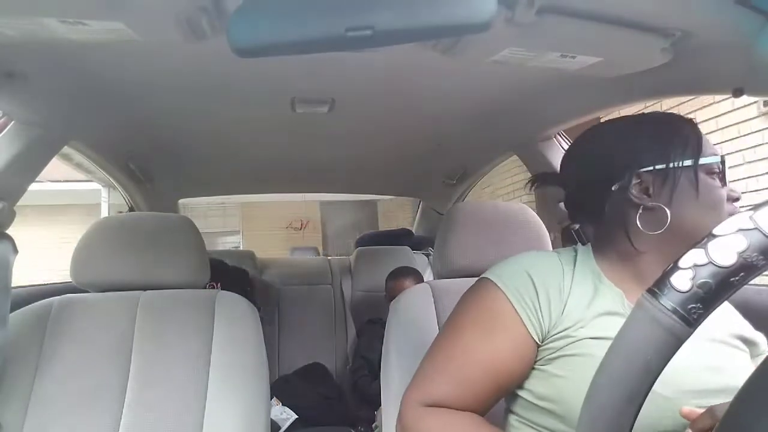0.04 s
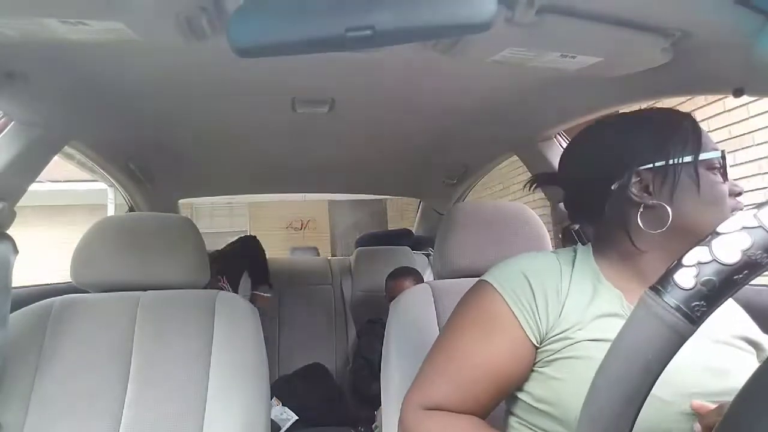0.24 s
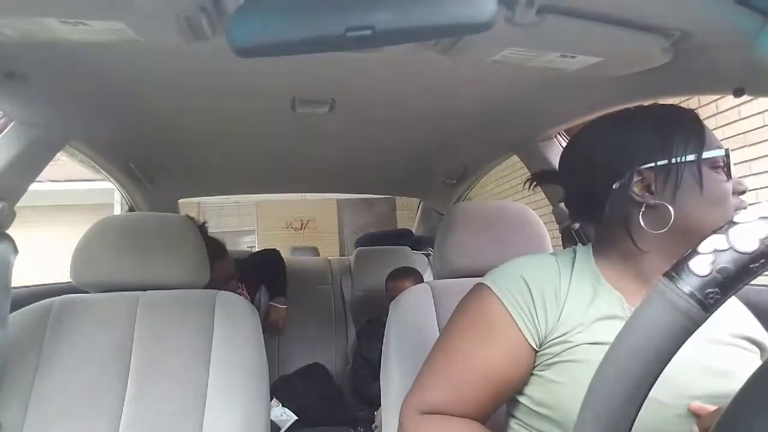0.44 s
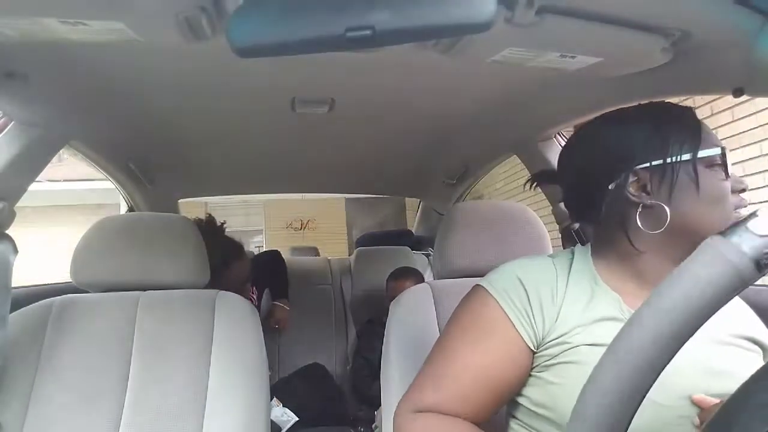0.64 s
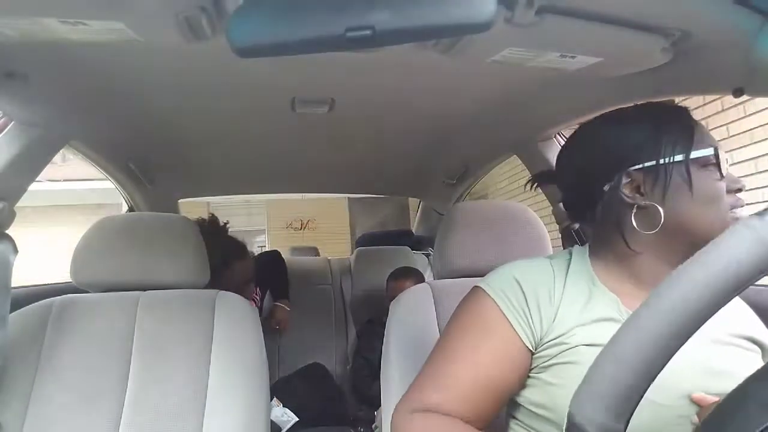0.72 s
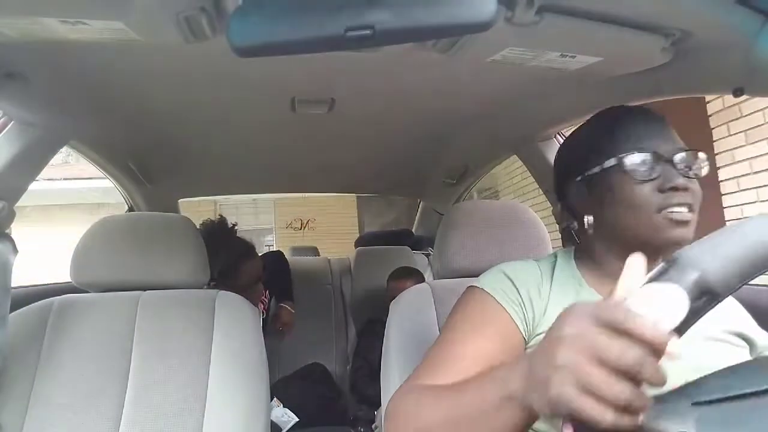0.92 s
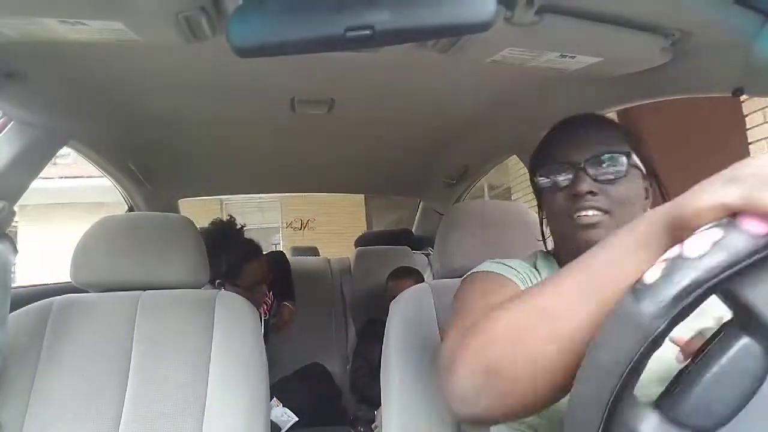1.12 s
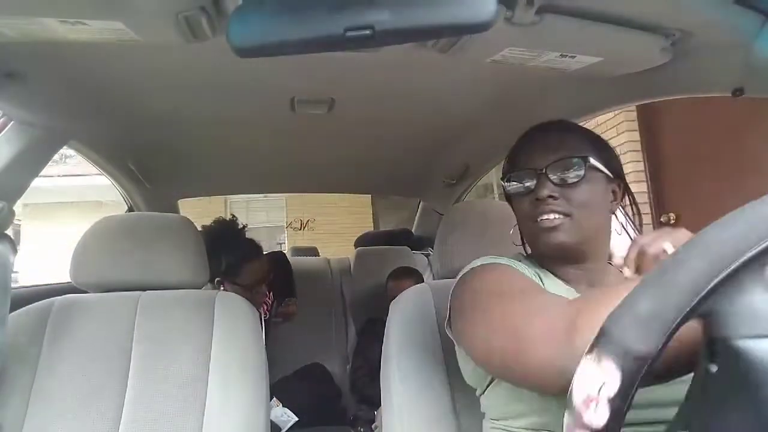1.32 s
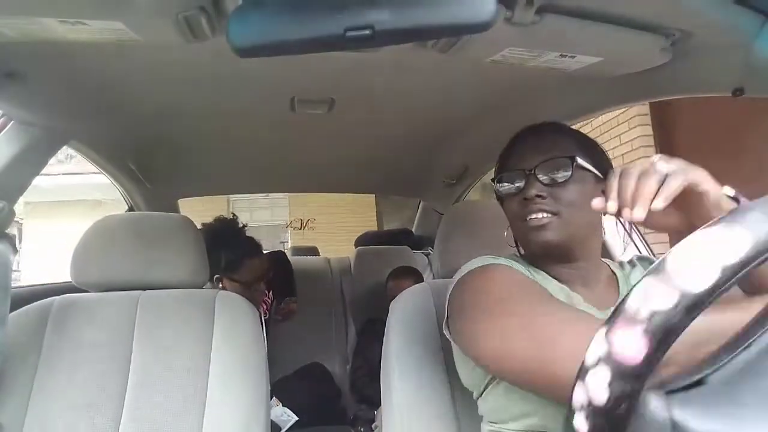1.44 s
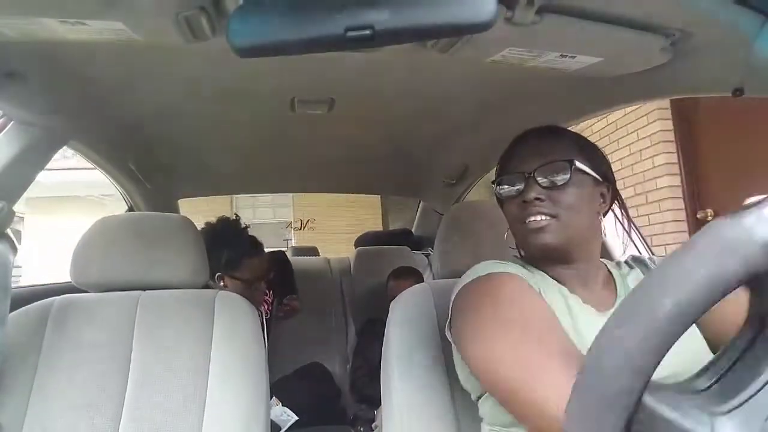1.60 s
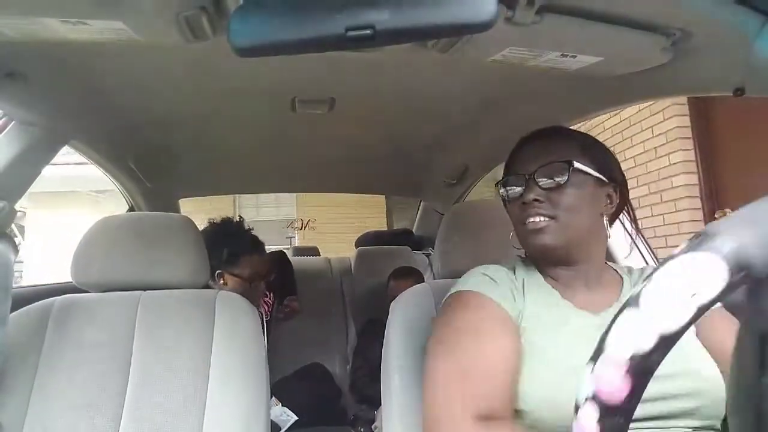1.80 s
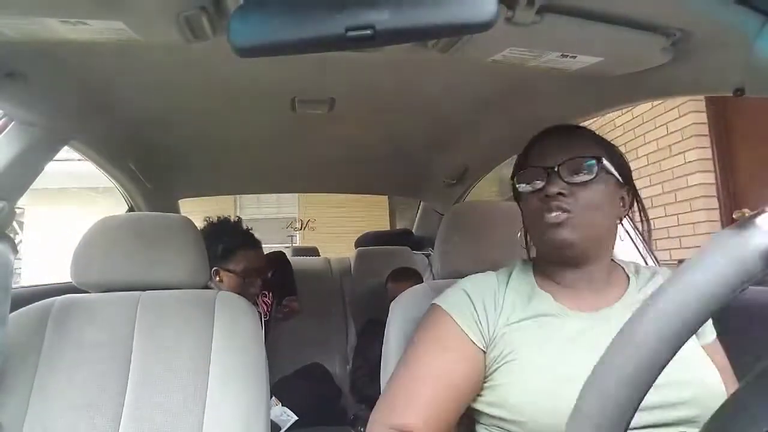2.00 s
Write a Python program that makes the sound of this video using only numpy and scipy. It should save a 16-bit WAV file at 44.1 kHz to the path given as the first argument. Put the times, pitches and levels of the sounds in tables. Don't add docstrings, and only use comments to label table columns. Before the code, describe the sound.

A car engine idles with a low hum while hands slide and scuff on the steering wheel

```python
import sys
import numpy as np
from scipy import signal
from scipy.fft import rfft, irfft, next_fast_len
from scipy.io import wavfile
from scipy.ndimage import uniform_filter1d

SR = 44100
rng = np.random.default_rng(int(sys.argv[2]) if len(sys.argv) > 2 else 0)


def gain_from_db(level_db):
    decades = np.asarray(level_db, float) / 20
    return 10 ** decades


def output_pcm(signal):
    pcm = np.clip(np.atleast_2d(signal).T, -1, 1) * 32767
    wavfile.write(sys.argv[1], SR, np.round(pcm).astype(np.int16))


N = 90801

# frequency in Hz, likeness from -1 (opposite) to 1 (same).
LIKENESS = [(60, 0.92), (130, 0.84), (280, 0.93), (600, 0.23), (1300, -0.53), (2810, 0.33), (6060, -0.44),
            (13100, 0.24)]


def evened(x):
    return x / np.sqrt(np.mean(x ** 2) + 1e-20)


def read(points, hz):
    f, value = np.transpose(points)
    return np.interp(np.log(hz + 1), np.log(f + 1), value)


def follow(table, axis=1):
    table = np.array(table)
    return np.interp(np.arange(N) / SR, table[:, 0], table[:, axis])


def resonate(x, hz, width):
    r = np.exp(-np.pi * abs(width) / SR)
    feedback = [1, -2 * r * np.cos(2 * np.pi * hz / SR), r * r]
    return (1 - r) * signal.lfilter([1, 0, -1], feedback, x)


def drift(rate):
    t = np.linspace(0, N / SR, 500)
    waves = 0
    for f in rate * np.geomspace(1 / 10, 1, 16):
        waves = waves + np.sin(2 * np.pi * (f * t + rng.random())) / np.sqrt(f)
    return np.interp(np.arange(N) / SR, t, evened(waves))


def wash(spectrum, patch_db, size=1024):
    frames, hz = 4 * N // size + 5, np.fft.rfftfreq(size, 1 / SR)
    a, b, c, d, patches = rng.standard_normal((frames, len(hz), 5)).T
    patches = uniform_filter1d(patches, size=12, axis=0)
    patches = evened(uniform_filter1d(patches, size=8, axis=1))
    same = np.clip(read(LIKENESS, hz), -1, 1)[:, None]
    left = a + 1j * b
    right = same * left + np.sqrt(1 - same ** 2) * (c + 1j * d)
    below = np.maximum(np.log2(spectrum[0][0] / (hz + 1)), 0)
    above = np.maximum(np.log2((hz + 1) / spectrum[-1][0]), 0)
    colour_db = read(spectrum, hz) - 20 * (below + above)
    level = gain_from_db(colour_db[:, None] + patch_db * patches) * (hz < 13150)[:, None]
    noise = signal.istft(np.array([left, right]) * level, nperseg=size, noverlap=3 * size // 4)[1]
    return evened(noise[:, :N])


def crank_hum(speed, load, turns):
    orders = [2, 2.5, 3, 3.5, 4, 5, 6, 8, 10, 11, 14, 17, 31, 35]
    # rms level in dB, dB gained at full steering load, dB gained as the idle speeds up.
    strengths = [(-33.5, -20, 2), (-70, 1, 24), (-33, -0.5, -1), (-47.5, 19, -3), (-40, 7.5, 5.5),
                 (-42, -6, -30), (-73.5, 33, -16), (-40, 5.5, -4.5), (-61, 0.5, 14.5), (-52.5, 0, 9),
                 (-50.5, -14, 14), (-52, -8.5, 0.5), (-61.5, -36.5, 10), (-62, 17, -7)]
    pipe_s, odd_lag = .0009, .22
    faster = np.tanh((speed - speed.min()) / 0.12)
    hum = np.zeros((2, N))
    for k, (db, load_db, speed_db) in zip(orders, strengths):
        uneven_db = .45 * np.log2(k) * drift(4.74)
        level = gain_from_db(db + load_db * load + speed_db * faster + uneven_db)
        skew = np.arccos(np.clip(read(LIKENESS, k * speed[0]), -1, 1)) / 2
        phase = k * (turns - pipe_s * speed) - odd_lag * (k % 2)
        hum += np.sqrt(2) * level * np.cos(2 * np.pi * phase + 0.81 * np.array([[skew], [-skew]]))
    return hum


def panel_buzz():
    # frequency in Hz, width in Hz, rms level in dB.
    panels = [(231.7, 38, -48), (302, 17, -53), (335, 20, -59), (414.8, 16, -52.5), (470.3, 37, -56.5),
              (973, 58, -64), (1245, 57, -64.5)]
    shaking = wash([(20, 0), (20000, 0)], 0, size=1024)
    buzz = np.zeros((2, N))
    for hz, width, db in panels:
        ring = resonate(resonate(shaking, hz, width), hz, width)
        buzz += gain_from_db(db + 2.2 * drift(3.96)) * evened(ring)
    return buzz


def engine():
    # time in seconds, crank turns per second.
    idle_speed = [
        (0, 13.3),
        (.2, 13.2),
        (.5, 13.2),
        (.75, 13.45),
        (1.0, 13.65),
        (1.35, 13.72),
        (1.5, 13.6),
        (1.7, 13.3),
        (2.06, 13.3),
    ]
    # time in seconds, load from 0 to 1.
    steering_load = [
        (0, 0.19),
        (.4, 0.04),
        (.7, 0),
        (1.0, 0.1),
        (1.3, 0.29),
        (1.5, 0.63),
        (1.75, 1),
        (2.06, 0.68),
    ]
    # frequency in Hz, level in dB per Hz.
    rumble_colour = [(15, -7), (28, -15.5), (55, -6.5), (97, -10), (184, -10), (421, -24), (618, -28.5),
                     (1500, -43)]
    speed, load = follow(idle_speed), follow(steering_load)
    turns = -.095 + np.cumsum(speed * (1 + .0008 * drift(2.52))) / SR
    throb = gain_from_db(2.0 * np.cos(4 * np.pi * turns) + 0.5 * load)
    rumble = gain_from_db(-35.5) * wash(rumble_colour, .5, size=4096)
    buzz = gain_from_db(4.1 * (speed - speed.mean()) - 3.9 * load) * panel_buzz()
    return crank_hum(speed, load, turns) + throb * (rumble + buzz)


def cabin_air():
    # frequency in Hz, level in dB per Hz.
    air_colour = [(800, 0.5), (967, -27), (1100, -1.5), (2270, -4.5), (2600, -8.5), (5000, -13.5),
                  (9500, -19), (13500, -20.5)]
    return gain_from_db(-57.5 + 0.69 * drift(8.7)) * wash(air_colour, 1.0, size=1024)


def slide():
    # time in seconds, level in dB.
    hiss_level = [(.5, -71), (.6, -68.5), (.85, -62.5), (1.1, -63), (1.4, -60.5), (1.63, -61.5),
                  (1.68, -55.5), (1.73, -48), (1.78, -46.5), (1.84, -54.5), (1.9, -57), (2.06, -64)]
    # frequency in Hz, level in dB per Hz.
    skin_colour = [(1000, -12), (2400, -2), (4600, -8), (6700, -1), (8100, -6), (9700, -3), (11200, -7),
                   (13500, -9)]
    flicker_db = .7 * drift(60.0)
    return gain_from_db(follow(hiss_level) + flicker_db) * wash(skin_colour, 2.1, size=512)


def scrape(events, modes):
    grit_per_s, grit_db, bright_db = 640, -2, 6
    size, centre = 2048, 1024
    out, t = np.zeros((2, N)), np.arange(size) / SR
    for middle, db, length, centre_hz in events:
        draw = rng.random((size, 5)).T
        grain_size = gain_from_db(-grit_db * np.log(draw[1] + 1e-3))
        grit = (draw[0] < grit_per_s / SR) * grain_size * np.sign(draw[2] - .5)
        grit = grit + 2.0 * np.exp(-length / .005) * (np.arange(size) == centre)
        friction = .45 * (draw[3:] - .5)
        drive = grit * [[1], [.6]] + np.roll(grit, 9) * [[0], [.6]] + friction
        drive = drive * np.sin(np.pi * np.clip((t - t[centre]) / (1.5 * length) + .5, 0, 1)) ** 2
        ring = np.zeros((2, size))
        for hz, width, mode_db in modes:
            level = gain_from_db(mode_db - bright_db * np.log2(hz / centre_hz) ** 2)
            ring += level * resonate(resonate(drive, hz, width), hz, width) / np.sqrt(width)
        burst = gain_from_db(db) * evened(ring) * np.sqrt(t[-1] / length)
        part = out[:, round(middle * SR) - centre:][:, :size]
        part += burst[:, :part.shape[1]]
    return out


def rim_scuffs():
    # middle in seconds, level in dB, length in seconds, centre of colour in Hz.
    scuff_events = [(.2465, -63, 0.0038, 1170), (.237, -64.5, 0.021, 2800), (.3335, -74, 0.0045, 2100),
                    (.337, -66, 0.0039, 1680), (.341, -83, 0.0059, 2100), (.3215, -91, 0.0035, 2200),
                    (0.769, -66.5, 0.016, 2206), (.85, -58.5, 0.046, 4930), (.871, -62, .014, 2170),
                    (.8812, -65, 0.0076, 2300), (.888, -62.5, 0.0098, 2770), (.8945, -71.5, 0.0057, 5460),
                    (.898, -64.5, 0.0086, 4940), (.906, -62.5, 0.0091, 3930), (.911, -66.5, .008, 2300),
                    (.921, -69, 0.024, 2400), (.972, -60.5, 0.017, 2300), (.9805, -64.5, 0.0037, 4400),
                    (.9815, -63, 0.0085, 2400), (.986, -60.5, 0.0077, 2700), (.988, -69, 0.0027, 4700),
                    (.9925, -72, 0.002, 2600), (.998, -61.5, .016, 3600), (1.195, -62, 0.043, 8500),
                    (1.27, -58.5, 0.028, 2180), (1.341, -64, 0.022, 8500), (1.658, -71, .01, 7350),
                    (2.029, -55.5, 0.014, 1590), (.2585, -80, 0.0025, 2650), (.57, -58, 0.094, 5200)]
    # frequency in Hz, width in Hz, level in dB.
    rim_modes = [(900, 260, 28), (1430, 640, 22.5), (1926, 100, 14), (2312, 180, 21.5), (2730, 110, 16.5),
                 (2980, 1300, 15), (4600, 720, 12), (5940, 1400, 9.5), (6800, 1900, 7.5), (8500, 1300, 12),
                 (9500, 250, 10), (11300, 900, 10)]
    return scrape(scuff_events, rim_modes)


def groan():
    # time in seconds, pitch in Hz, rms level in dB.
    pump = [
        (1.6, 184, -33),
        (1.646, 178.6, -29),
        (1.706, 164.3, -38),
        (1.728, 167, -24),
        (1.822, 167.9, -58),
        (1.858, 169.5, -23),
        (1.918, 179.6, -32.5),
        (1.998, 172.1, -27),
        (2.059, 164, -34.5),
    ]
    rise = np.clip((np.arange(N) / SR - pump[0][0]) / .04, 0, 1)
    cycles = np.cumsum(follow(pump, axis=1)) / SR
    return np.sqrt(2) * rise * gain_from_db(follow(pump, axis=2) - 2.5) * np.sin(2 * np.pi * cycles)


def thumps():
    # start in seconds, level in dB, hardness from 0 to 1.
    pushes = [(1.638, -22, 0.5), (1.652, -24.5, 0.7), (1.713, -14.5, 0.54), (1.723, -22.5, 0.83),
              (1.788, -46, 0.1), (1.844, -16.5, 0.86), (1.882, -19.5, 0.73), (1.916, -20, 0.86),
              (1.946, -15.5, 0), (1.978, -27, 0.52), (2.004, -17, 0.63), (2.035, -23, 0.8)]
    # frequency in Hz, level in dB, time to fall by 60 dB in seconds.
    dash_modes = [(174, 1, 0.074), (200.6, -4, 0.092), (232.7, -6.5, 0.19), (276.7, -4.5, 0.11),
                  (342.3, -10, 0.099), (374, -36, 0.056), (471, -14, 0.087), (570, -15, 0.096),
                  (723, -23, 0.073), (878, -24.5, 0.043), (99, -1, 0.07), (252, -5.5, 0.14)]
    push_s, hard_db, spot_db, detune_share, side_skew = 0.0073, 8, 3.0, .015, 0.33
    first_hz = dash_modes[0][0]
    u, out = np.arange(12000) / SR, np.zeros((2, N + 12000))
    for start, db, hard in pushes:
        chances = rng.uniform(-1, 1, (len(dash_modes), 3))
        for (hz, mode_db, t60), (side, detune, spot) in zip(dash_modes, chances):
            height = np.log2(hz / first_hz)
            level_db = db + mode_db + spot_db * spot * min(height, 1) + hard_db * (hard - .5) * height
            ring = gain_from_db(level_db - 60 * u / t60) * (1 - np.exp(-u / push_s))
            skew = side_skew * side * hz / first_hz * np.array([[1], [-1]])
            pitch = hz * (1 + detune_share * detune * min(height + 0.85, 1))
            out[:, round(start * SR):][:, :len(u)] += ring * np.sin(2 * np.pi * pitch * u + skew)
    knock = gain_from_db(-22.5 - 60 * u / 0.038) * (1 - np.exp(-u / 0.002)) * np.sin(2 * np.pi * 654 * u)
    out[:, round(2.011 * SR):][:, :len(u)] += knock
    return out[:, :N]


def stalk_snaps():
    # middle in seconds, level in dB, length in seconds, centre of colour in Hz.
    snap_events = [(2.002, -62.5, 0.0067, 3887), (2.007, -60.5, 0.009, 4300), (2.011, -57, 0.0043, 4620),
                   (2.0155, -64, 0.0061, 4020), (2.019, -70, 0.0058, 4460), (2.022, -62, 0.0044, 3230),
                   (2.0252, -61.5, 0.0029, 3240), (2.0265, -66, 0.0037, 7000), (2.021, -65, 0.006, 7900),
                   (2.010, -60, 0.013, 5500), (2.034, -69, 0.013, 3400)]
    # frequency in Hz, width in Hz, level in dB.
    stalk_modes = [(3082, 440, 9), (4000, 710, 6.5), (4300, 450, 2), (4700, 740, 7), (5130, 1400, -4),
                   (6900, 1300, 3.5), (9280, 540, 4), (10900, 1400, 5.5), (12700, 1000, 7)]
    return scrape(snap_events, stalk_modes)


def scene():
    return engine() + cabin_air() + slide() + rim_scuffs() + groan() + thumps() + stalk_snaps()


def top_cut(x):
    return signal.sosfilt(signal.butter(12, 13670, fs=SR, output="sos"), x)


def record(dry):
    # frequency in Hz, left over right in dB.
    port_lean = [(60, 2), (110, 2), (200, 3.5), (360, 3.5), (660, 1.5), (1190, 2), (2170, -1.5),
                 (3950, 1.5), (7190, -0.5), (13100, 7)]
    margin = 4096
    after = next_fast_len(N + 2 * margin) - N - margin
    padded = np.pad(dry, [(0, 0), (margin, after)], mode="reflect")
    lean = read(port_lean, np.fft.rfftfreq(padded.shape[1], 1 / SR)) / 2
    ports = irfft(rfft(padded) * gain_from_db(np.array([lean, -lean])), padded.shape[1])
    ports = ports[:, margin:margin + N]
    ports = ports * np.minimum(np.arange(N)[::-1] / 60, 1)
    return top_cut(ports)


dry = scene()
out = record(dry)
output_pcm(out)
```